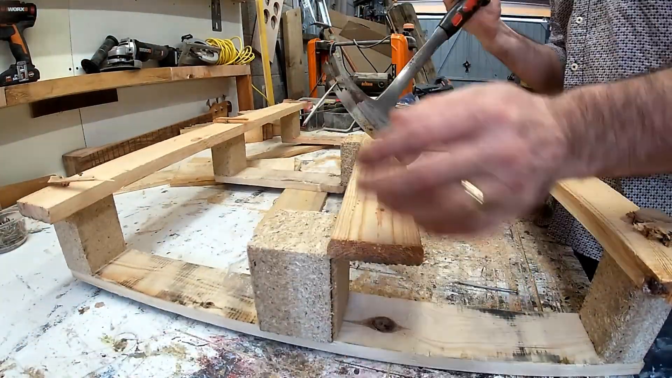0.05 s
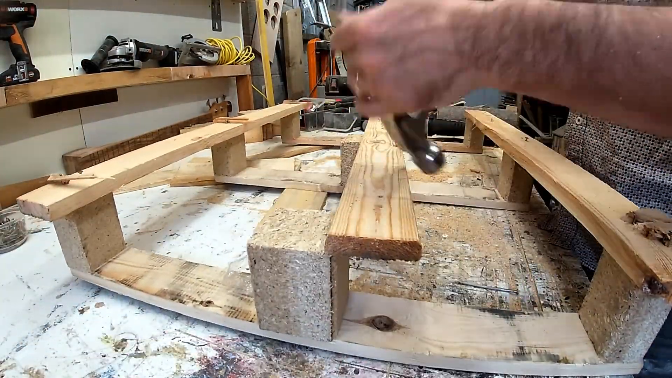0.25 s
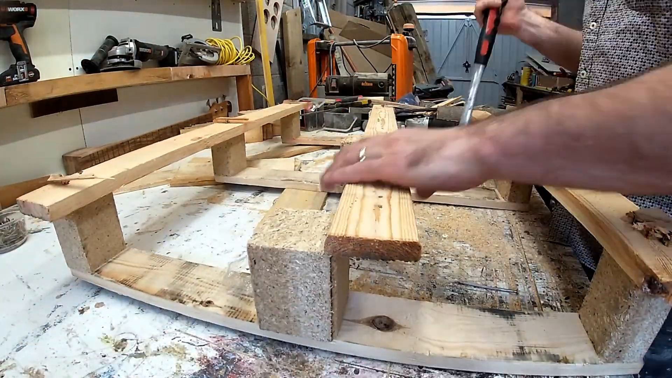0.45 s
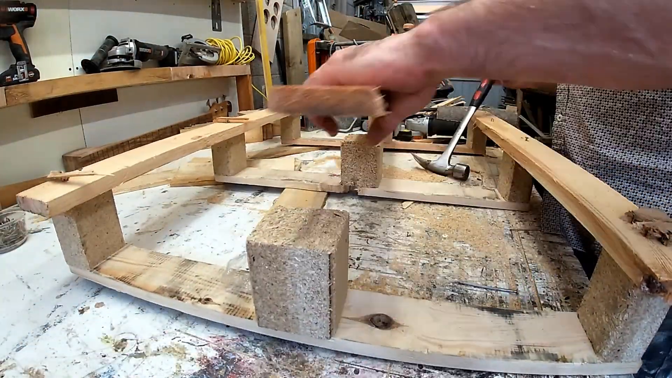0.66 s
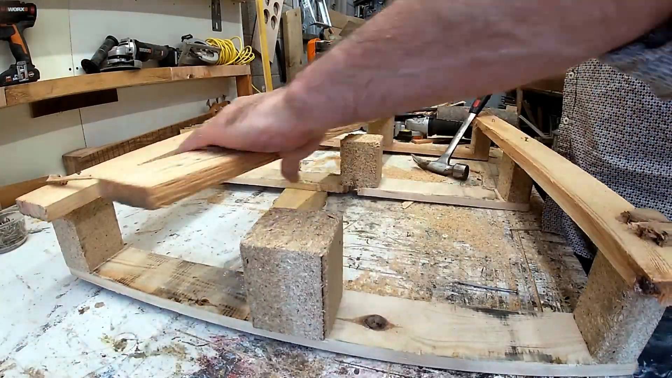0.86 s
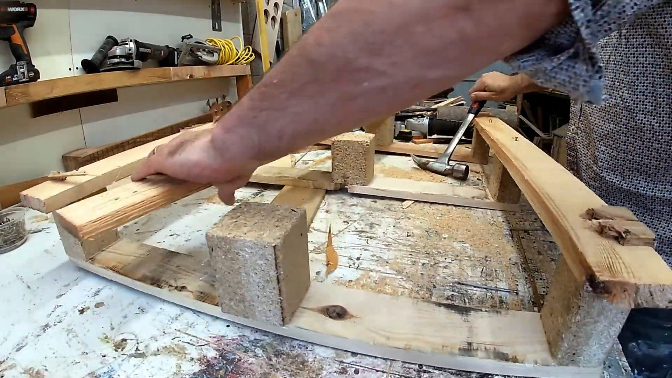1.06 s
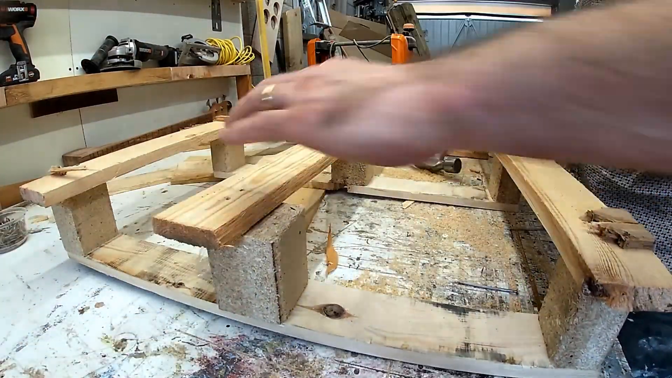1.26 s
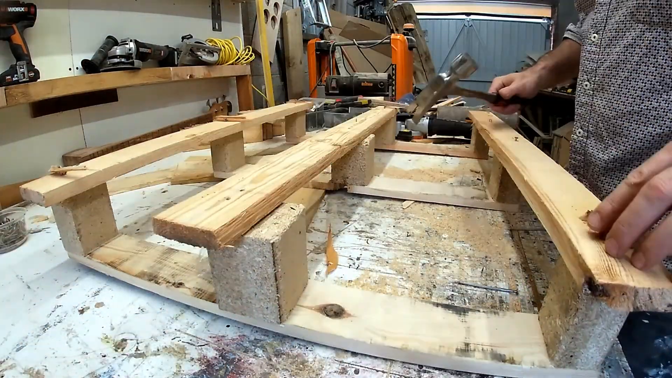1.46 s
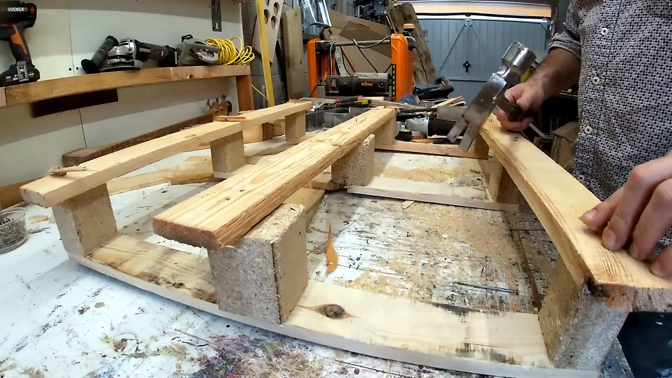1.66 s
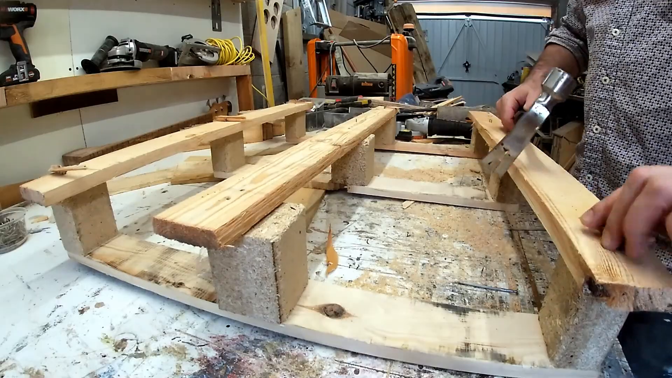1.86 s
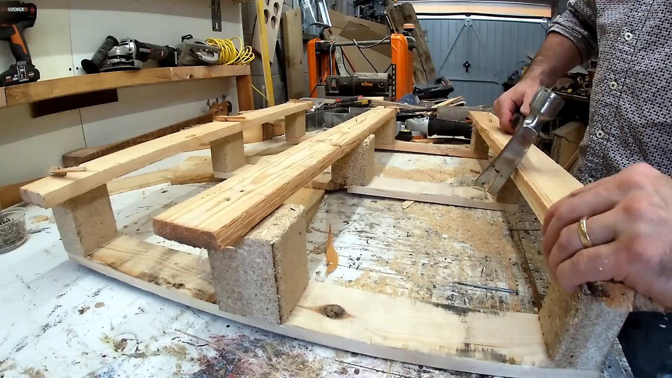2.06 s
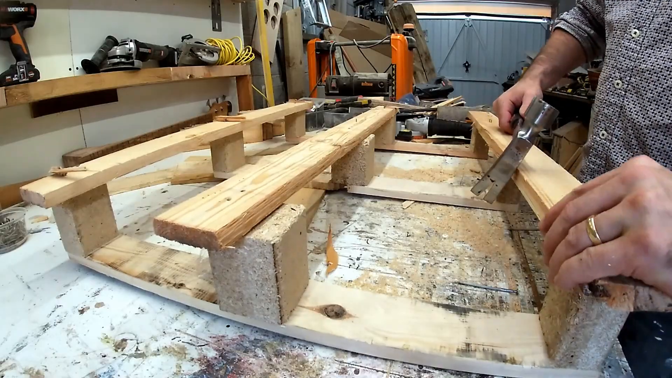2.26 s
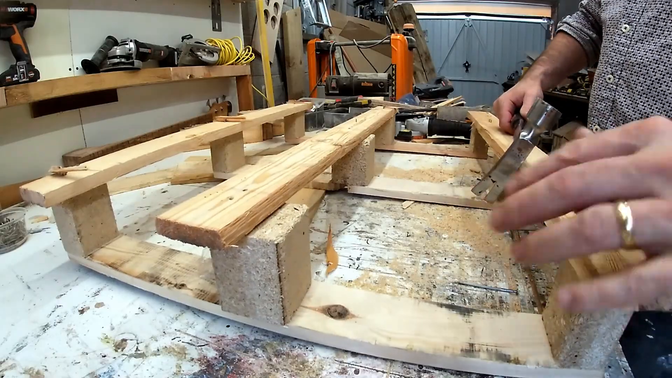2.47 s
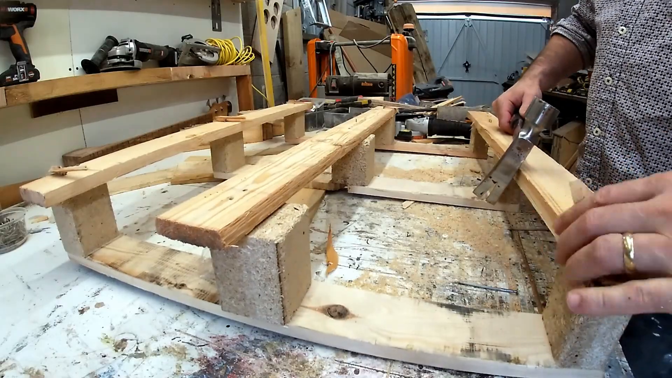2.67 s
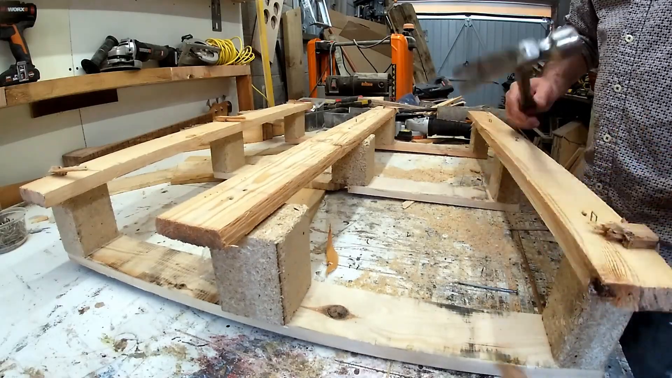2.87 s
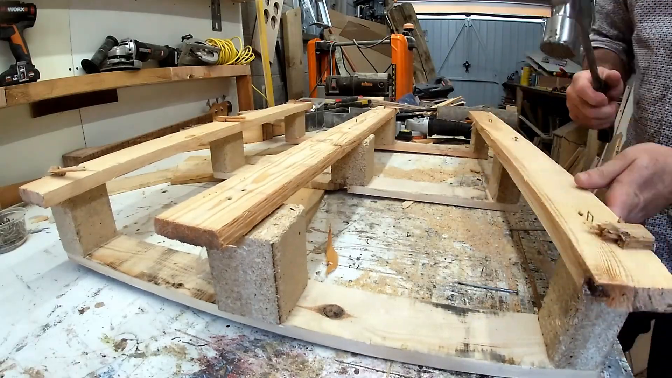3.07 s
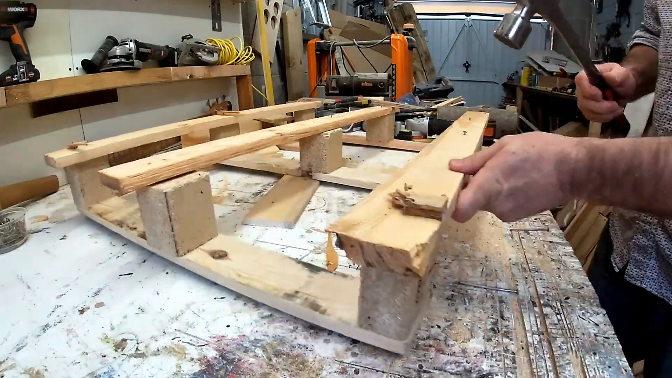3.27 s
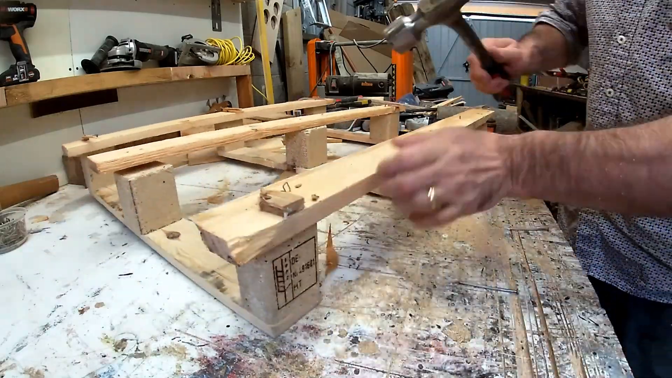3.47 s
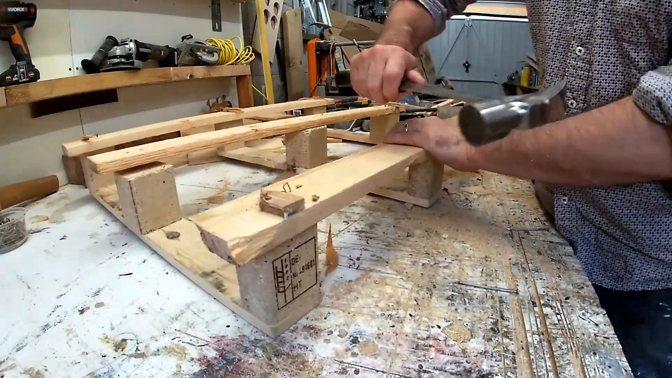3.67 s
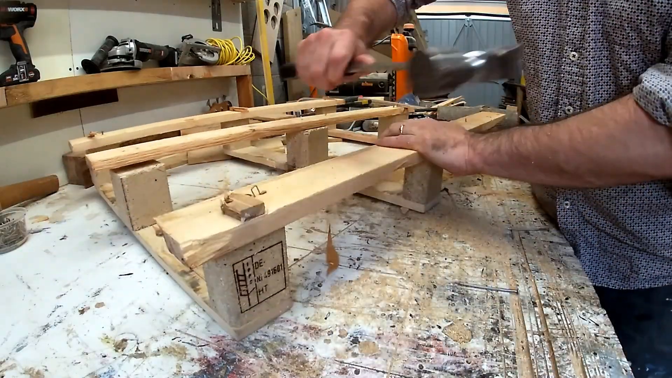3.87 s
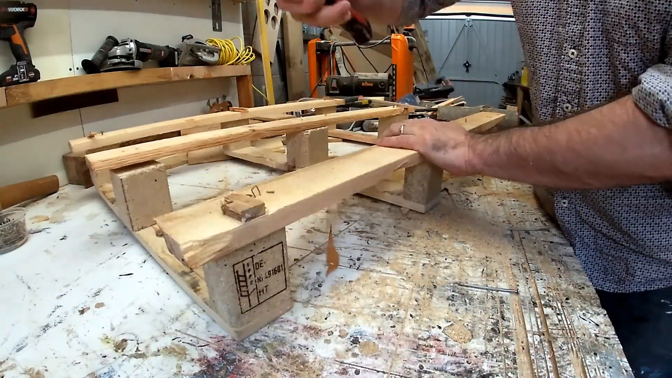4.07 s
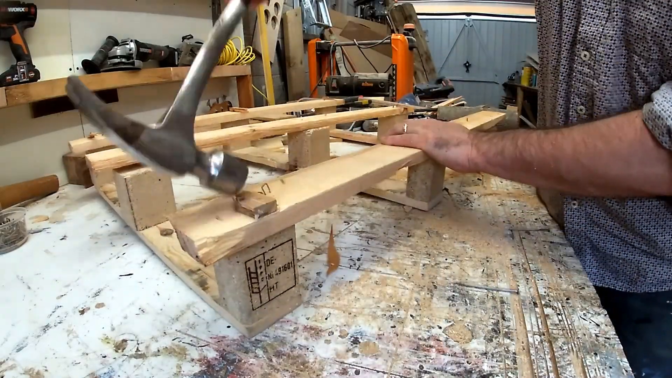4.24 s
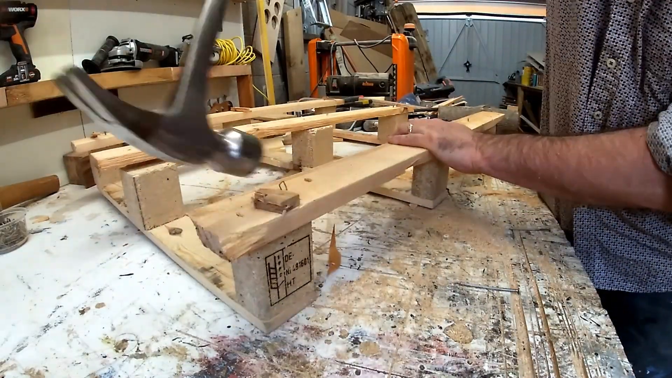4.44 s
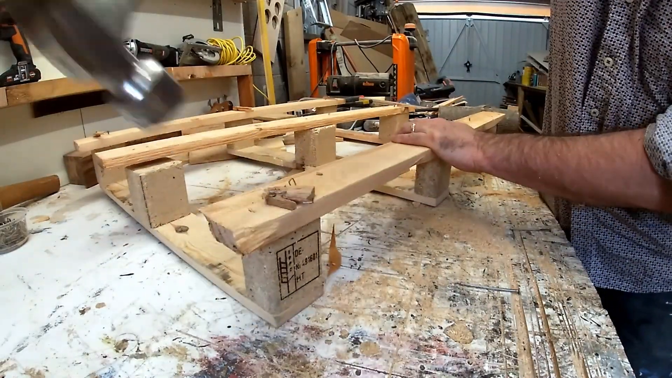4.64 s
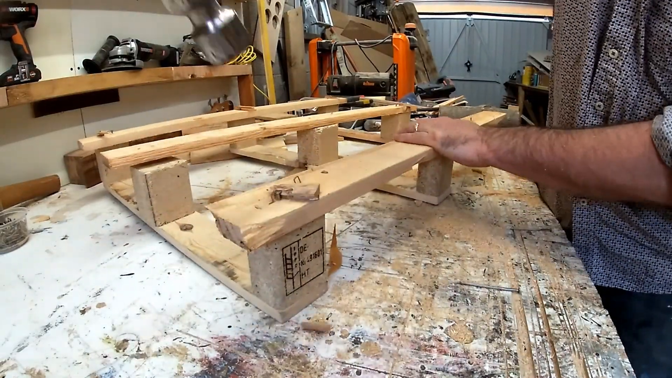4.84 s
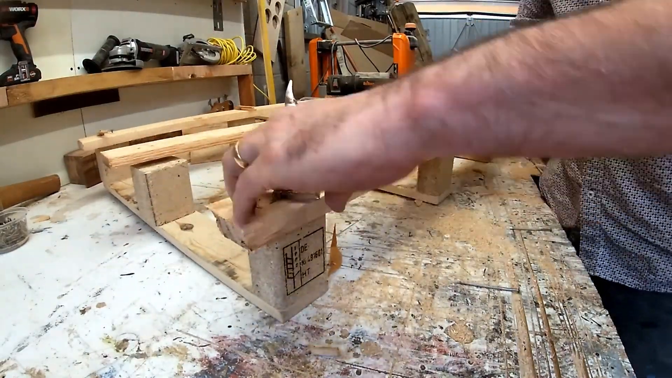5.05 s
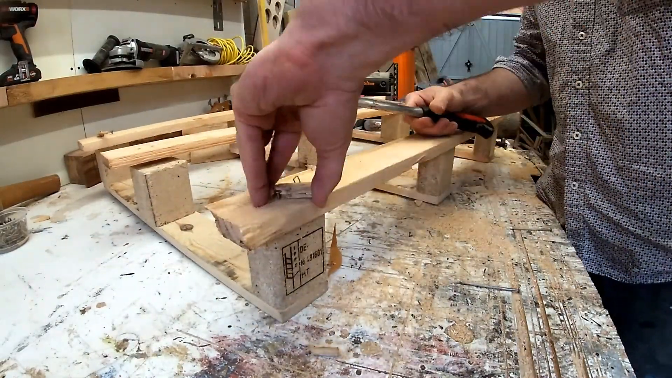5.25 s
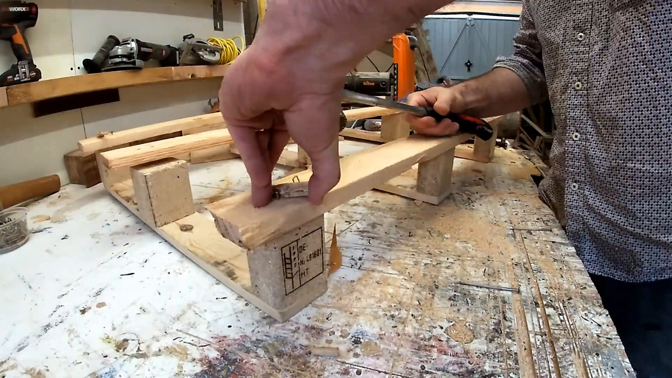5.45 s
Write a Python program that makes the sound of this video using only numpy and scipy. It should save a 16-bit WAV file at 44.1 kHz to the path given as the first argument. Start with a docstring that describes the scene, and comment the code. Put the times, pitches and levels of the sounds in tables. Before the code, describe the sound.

Loose wooden boards clack, creak and scrape on a workshop bench, then a steel hammer strikes a nailed plank six hard times.

```python
"""Pallet taken apart on a workshop bench

Levered boards crack, bump and slide amid light taps and steel clicks, the pallet is dragged round over
the gritty bench top, and a steel claw hammer gives a nailed plank six hard blows. Struck wood is a sum
of dying modes plus noise bursts; snaps are spikes in noise; sliding, creaks and grit are clumpy coloured
noise; nails squeak as gliding sines. Near echoes and a short room tail, over rumble, air and hiss.
"""
import sys
import numpy as np
from scipy import signal
from scipy.fft import rfft, irfft, next_fast_len
from scipy.io import wavfile

SR = 44100
rng = np.random.default_rng(int(sys.argv[2]) if len(sys.argv) > 2 else 0)


def int16_out(signal):
    """Quantize to a 16-bit WAV file."""
    q = np.round(np.clip(np.atleast_2d(signal).T, -1, 1) * 32767)
    wavfile.write(sys.argv[1], SR, q.astype(np.int16))


N = 242991
TIME = np.arange(N) / SR
AGE = TIME[:SR // 2]  # seconds since a contact


def from_db(db):
    """Turns decibels into an amplitude factor."""
    return 10 ** (np.asarray(db) / 20)


def rms_one(x):
    """Scales a steady signal to rms 1."""
    return x / np.sqrt(np.mean(x ** 2) + 1e-20)


def hit_one(x):
    """Scales a hit to rms 1 over its first 20 ms."""
    return x / np.sqrt(np.mean(x[:SR // 50] ** 2))


def dying(t60):
    """Exponential decay that loses 60 dB in t60 seconds."""
    return from_db(-60 * AGE / t60)


def at_hz(points, hz):
    """Reads a curve between its points, along a logarithmic frequency axis."""
    f, value = np.transpose(points)
    return np.interp(np.log(hz + 1), np.log(f), value)


def gain_curve(s, db):
    """Level drawn in straight dB lines from point to point, silent outside them."""
    return from_db(np.interp(TIME, s, db, -np.inf, -np.inf))


def coloured(x, spectrum):
    """Gives a steady signal a spectrum with steep outer skirts; rms 1."""
    hz = np.arange(len(x) // 2 + 1) * SR / len(x)
    low_skirt = 1 / (1 + (spectrum[0][0] / (hz + 1)) ** 8)
    high_skirt = 1 / (1 + (hz / spectrum[-1][0]) ** 8)
    gain = from_db(at_hz(spectrum, hz)) * low_skirt * high_skirt
    return rms_one(irfft(rfft(x) * gain, len(x)))


def noise(spectrum, size):
    """Steady noise with a given spectrum."""
    return coloured(rng.standard_normal(next_fast_len(size)), spectrum)[:size]


def band(x, low_hz, high_hz, order=2):
    """Keeps one frequency band."""
    sos = signal.butter(order, [low_hz, high_hz], "band", fs=SR, output="sos")
    return signal.sosfilt(sos, x)


def highpass(x, low_hz):
    """Cuts the bass below low_hz."""
    return signal.sosfilt(signal.butter(2, low_hz, "high", fs=SR, output="sos"), x)


def drift(rate):
    """Slow random wander of spread 1, with rate knots per second."""
    knots = rng.standard_normal(N // 20)
    return rms_one(np.interp(TIME * rate, np.arange(len(knots)), knots))


def add(track, s, sound):
    """Mixes a sound into a track at s seconds."""
    start = int(round(s * SR))
    track[start:start + len(sound)] += sound[:N - start]


def ring(modes, t60, vary_db, detune, emphasis=((100, 0), (1000, 0))):
    """One blow on a body: each mode shifts with where it is hit and held; higher modes die sooner."""
    out = 0
    lowest_hz = modes[0][0]  # the mode that t60 belongs to
    for hz, db in modes:
        strength, shift = rng.standard_normal(2)
        height = from_db(db + at_hz(emphasis, hz) + vary_db * strength)
        decay = dying(t60 * (lowest_hz / hz) ** (1 / 4))
        out = out + height * decay * np.sin(2 * np.pi * hz * (1 + detune * shift) * AGE)
    return hit_one(out)


def burst(spectrum, crack_t60, tail_t60, tail_db):
    """Modes too dense to tell apart: a quick crack and a weaker tail."""
    decay = dying(crack_t60) + from_db(tail_db) * dying(tail_t60)
    return hit_one(noise(spectrum, len(AGE)) * decay)


def grit(spectrum, grain_db, catch_db, patchy_db):
    """Crushed grains come in clumps, and the colour shifts as the contact patch moves."""
    grain_levels = from_db(grain_db * rng.standard_normal(N) + catch_db * drift(120))
    hiss = coloured(rng.standard_normal(N) * grain_levels, spectrum)
    edges = np.geomspace(500, 18000, 11)
    out = 0
    for low, high in zip(edges, edges[1:]):
        out = out + band(hiss, low, high, order=1) * from_db(patchy_db * drift(35))
    return rms_one(out)


# low rumble of the shop, over time; columns: time_s, level_db
RUMBLE_LEVELS = [(0.0, -57.5), (0.35, -53), (1.45, -50.5), (1.95, -57), (2.8, -46.5), (3.3, -57.5),
                 (4.7, -50.5), (5.5, -53)]
# spectra of the rumble, the air and the hiss; columns: freq_hz, relative_density_db (per Hz)
RUMBLE_SPECTRUM = [(13, -25.5), (22, 7.5), (70, 13.5), (97, 6.5), (124, 4), (170, -23), (220, -35.5),
                   (370, -120)]
AIR_SPECTRUM = [(76, -37.5), (130, -4), (167, -17), (247, -13), (467, 1.5), (655, -11.5), (769, -3),
                (1100, -22.5), (1430, -49.5), (2420, -120)]
HISS_SPECTRUM = [(590, -23.5), (1000, -0.5), (1350, -3), (1590, 0), (5130, -3.5), (13600, -13),
                 (16000, -31)]
# swells added to the steady hiss; columns: top_s, half_width_s (to 1/e), level_db
HISS_SWELLS = [(0.04, 0.19, -49.5), (2.85, 0.18, -68), (3.65, 0.21, -76.5), (4.192, 0.12, -71.5),
               (5.2, 0.19, -63)]
AIR_DB, STEADY_HISS_DB = -57, -69


def background():
    """Three noises of the shop: rumble that rises and falls, steady air, hiss that swells and sinks."""
    rumble_level = from_db(np.interp(TIME, *np.transpose(RUMBLE_LEVELS)))
    rumble = rumble_level * noise(RUMBLE_SPECTRUM, N)
    hiss_level = from_db(STEADY_HISS_DB)
    for top_s, width_s, db in HISS_SWELLS:
        hiss_level = hiss_level + from_db(db) * np.exp(-((TIME - top_s) / width_s) ** 2)
    hiss = hiss_level * noise(HISS_SPECTRUM, N)
    return rumble + hiss + from_db(AIR_DB) * noise(AIR_SPECTRUM, N)


# modes of a loose board; columns: pitch_hz, relative_level_db
BOARD_MODES = [(165, -18.5), (226, -9.5), (258, -3), (290, 1), (345, 4.5), (398, 6), (470, 7), (548, 4),
               (610, -10.5), (680, -10), (735, -2), (790, -13.5), (926, -10.5), (1367, -22), (1470, -27.5)]
# clack of wood, also heard in the hammer blows; columns: freq_hz, relative_density_db (per Hz)
CLACK_SPECTRUM = [(500, -12.5), (900, 0.5), (1500, 3), (2400, -7.5), (3500, -10.5), (6000, -16.5),
                  (15000, -36.5)]


def touch(body_db, weight_db, clack_db):
    """A bump or tap on wood: a soft contact that builds over a few milliseconds, then rings and dies."""
    # a heavier, slower contact leans on the low modes
    weight = [(260, weight_db), (400, 0.0077)]
    modes = ring(BOARD_MODES, t60=0.1, vary_db=4.0, detune=0.042, emphasis=weight)
    body = from_db(body_db) * hit_one(highpass(modes, 280) * (dying(0.77) + 0.54))
    clack = from_db(clack_db) * burst(CLACK_SPECTRUM, crack_t60=0.065, tail_t60=0.37, tail_db=-21.5)
    soft_onset = 1 - dying(0.006)
    return (body + clack) * soft_onset


# bumps and light taps of boards, fingers and tool; body and clack levels are before the soft onset
# columns: start_s, body_db, low_mode_weight_db, clack_db, second_touch_db (added to the second touch)
BUMPS_AND_TAPS = [(0.113, -39, -6.5, -49, -11.5), (0.3, -40, -5, -53.5, -8.5), (0.402, -27.5, -6, -45, -9),
                  (0.468, -26, -9, -41, -26), (0.584, -12.5, -5.5, -26, -20.5),
                  (0.783, -34, -32, -44.5, -14), (0.821, -30, -7, -44, -1.5), (1.052, -35.5, 12, -47, -3),
                  (1.176, -40, 28, -69, -17), (1.298, -29, 0, -51, -20), (1.65, -39, -25, -55.5, -26),
                  (1.91, -38, -7, -56, -16), (1.967, -31, -7, -55, 5), (2.079, -41, -6, -79, 0),
                  (2.147, -41, -4, -75, -12), (2.408, -27, 9.5, -48, 6), (2.458, -22, 1.5, -54.5, -9),
                  (2.837, -23.5, -1.5, -62, -12.5), (2.977, -43.5, -34, -35, -22),
                  (3.065, -46, -28, -42.5, 1.5), (3.209, -28.5, 21, -45, -2.5),
                  (3.334, -31, 6.5, -42.5, -6), (3.849, -27.5, 5, -36, -18), (3.887, -30, -10, -49, -19),
                  (5.07, -38, 17, -80, -26), (5.12, -38, 22, -85, -13.5), (5.159, -39, -19, -73, -10.5),
                  (5.345, -47.5, -15, -83, -16)]
# second touch: delay in s, extra low-mode weight in dB, change of clack in dB
SECOND_S, SECOND_WEIGHT_DB, SECOND_CLACK_DB = .024, 7, -5


def bumps_and_taps():
    """Bumps and light taps of boards, fingers and tool, each with a duller second touch."""
    out = np.zeros(N)
    for s, body_db, weight_db, clack_db, second_db in BUMPS_AND_TAPS:
        second = touch(body_db, weight_db + SECOND_WEIGHT_DB, clack_db + SECOND_CLACK_DB)
        add(out, s, touch(body_db, weight_db, clack_db))
        add(out, s + SECOND_S, from_db(second_db) * second)
    return out


def brief_ring(force, low_hz, high_hz, t60, ring_db, count):
    """Each snap or click rings briefly at pitches of its own, under the direct sound of its force."""
    steps = (np.arange(count) + rng.random(count)) / count
    pitches = low_hz * (high_hz / low_hz) ** steps
    age = AGE[:SR // 10]
    waves = np.cos(2 * np.pi * pitches[:, None] * age)
    modes = waves.T @ rng.normal(0, 1, count) * dying(t60)[:len(age)]
    direct = band(force, low_hz, high_hz)
    rung = signal.fftconvolve(direct, modes)[:len(force)]
    return direct + from_db(ring_db) * rung * np.std(direct) / np.std(rung)


# sharp snaps and steel clicks; columns: spike_s, mid_db, treble_db, tail_db (of the force after the spike)
SNAPS_AND_CLICKS = [(0.295, -53.5, -57.5, -14), (0.395, -49.5, -51, 0), (0.4672, -30, -20.5, -21),
                    (0.477, -36, -50, -11), (0.5597, -34, -31, -5), (0.5966, -51, -49.5, 4),
                    (0.6107, -58, -36, -13.5), (0.642, -49, -38, -7), (0.819, -38.5, -63, 2),
                    (0.9084, -47, -50, 4), (1.006, -41, -52, -2), (1.1588, -41.5, -44.5, -6),
                    (1.906, -56.5, -57, 4), (2.1037, -52.5, -62, -20), (2.3001, -68.5, -51.5, -19),
                    (2.3943, -47.5, -39, -3), (2.4023, -31.5, -28, 3), (2.9425, -26, -53, 1.5),
                    (2.9786, -28.5, -66, -16), (3.0842, -43.5, -53.5, 0), (3.1522, -36.5, -64, 5),
                    (4.9053, -48, -49, -7)]
# force of the spike; force of the swell before it at 0 dB treble; swell dB per dB of treble
SPIKE_DB, SWELL_DB, SWELL_FOLLOWS = 12.5, -4, 0.561


def snaps_and_clicks():
    """Sharp snaps and steel clicks: short noise swells into a spike, then dies away."""
    out = np.zeros(N)
    lead = SR // 50  # 20 ms of swelling noise
    for s, mid_db, treble_db, tail_db in SNAPS_AND_CLICKS + ticks():
        before = from_db(SWELL_DB + SWELL_FOLLOWS * treble_db) * dying(0.015)[:lead][::-1]
        after = 0.2 * dying(0.0054) + from_db(tail_db) * dying(0.07)
        envelope = np.concatenate([before, after])
        uneven = from_db(2.5 * rng.standard_normal(len(envelope)))
        force = envelope * rng.standard_normal(len(envelope)) * uneven
        force[lead] += from_db(SPIKE_DB)
        mid = brief_ring(force, 1700, 5600, t60=0.01, ring_db=-10.0, count=14)
        treble = brief_ring(force, 6200, 14500, t60=.02, ring_db=-10.0, count=8)
        for part, db in (mid, mid_db), (-treble, treble_db):
            # levels hold over the 20 ms from the spike on
            add(out, s - lead / SR, from_db(db) * part / np.std(part[lead:2 * lead]))
    return out


# a board is lifted off, shifted across, the pallet is dragged round and nudged
# columns: time_s, judder_db, grit_db
LIFT = [(0.75, -47, -65), (0.82, -33, -45), (0.844, -29, -49), (0.9, -67, -69)]
SHIFT = [(0.9, -61, -75), (0.906, -49, -63), (0.94, -30.5, -45), (1.024, -42, -40.5), (1.054, -30, -33.5),
         (1.106, -45, -42.5), (1.224, -39, -52), (1.286, -25, -34.5), (1.36, -58.5, -97)]
DRAG = [(3.13, -74, -55), (3.15, -51.5, -42.5), (3.22, -35, -31), (3.294, -39.5, -31), (3.378, -34, -37.5),
        (3.4, -35, -41), (3.498, -33, -34), (3.56, -61.5, -63)]
NUDGE = [(3.6, -80.5, -63), (3.666, -55.5, -47.5), (3.72, -77, -81)]
# spectra of shaken boards and crushed grit; columns: freq_hz, relative_density_db (per Hz)
JUDDER_SPECTRUM = [(53, -54.5), (90, -6.5), (151, -11), (239, 0.5), (301, 0.5), (460, 2.5), (578, -2.5),
                   (641, -10), (744, -8.5), (1400, -19), (1820, -23), (3080, -120)]
GRIT_SPECTRUM = [(470, -19.5), (800, -9.5), (1700, -12.5), (2380, -6), (2950, -12), (4130, -4.5),
                 (5310, -11.5), (6570, -8.5), (8880, -8.5), (14800, -18.5), (16000, -17)]


def sliding():
    """Catches and slips shake the boards while grit is crushed under them."""
    shaking = crushing = 0
    for stroke in (LIFT, SHIFT, DRAG, NUDGE):
        s, judder_db, grit_db = np.transpose(stroke)
        shaking = shaking + gain_curve(s, judder_db)
        crushing = crushing + gain_curve(s, grit_db)
    slips = rng.standard_normal(N) * from_db(2.8 * rng.standard_normal(N) + 3.7 * drift(130))
    judder = shaking * coloured(slips, JUDDER_SPECTRUM)
    return judder + crushing * grit(GRIT_SPECTRUM, grain_db=1.0, catch_db=1.0, patchy_db=3.5)


# nails squeak in the wood; columns: start_s, length_s, centre_pitch_hz, peak_db
SQUEAKS = [(0.798, 0.028, 6450, -41.5), (0.937, 0.02, 5070, -40), (2.783, 0.028, 13400, -45),
           (3.148, .02, 7200, -53), (3.149, .022, 3630, -38)]


def squeaks():
    """A nail slips through its hole with an unsteady, slightly falling whistle."""
    out = np.zeros(N)
    for s, length_s, hz, db in SQUEAKS:
        size = int(length_s * SR)
        wobble = 0.057 * drift(820)[:size]
        fall = 0.036 * np.linspace(-1, 1, size)
        pitch = hz * (1 + wobble - fall)
        whistle = np.sin(2 * np.pi * np.cumsum(pitch) / SR)
        add(out, s, from_db(db) * signal.windows.tukey(size) * whistle)
    return out


# the claw is worked under a board; columns: start_s, length_s, creak_end_db, strongest_tick_db
CREAKS = [(1.483, .1, -56, -58), (1.902, .21, -55, -61), (2.205, .19, -63, -61), (2.583, .28, -54, -60)]
# columns: freq_hz, relative_density_db (per Hz)
CREAK_SPECTRUM = [(710, -86), (1200, -8), (1540, -10), (1870, -22), (2950, 7.5), (3620, -12.5), (4800, 3.5),
                  (6100, -4), (6650, -7.5), (14000, -10), (16000, -14)]
CREAK_RISE_DB = 7  # growth over one push


def creaking():
    """The claw works its way under a board in small dry slips that grow as the push builds."""
    effort = 0
    for start_s, length_s, end_db, _ in CREAKS:
        effort = effort + gain_curve([start_s, start_s + length_s], [end_db - CREAK_RISE_DB, end_db])
    return effort * grit(CREAK_SPECTRUM, grain_db=7.0, catch_db=7.5, patchy_db=-1.0)


# rate of the ticks; their treble against their mid level; the tail of their force
TICKS_PER_S, TICK_TREBLE_DB, TICK_TAIL_DB = 18, 0, -1


def ticks():
    """Small fibres give way at uneven moments of each push: rows of faint snaps for snaps_and_clicks()."""
    rows = []
    for start_s, length_s, _, tick_db in CREAKS:
        count = max(1, round(length_s * TICKS_PER_S))
        for k, (when, weakness) in enumerate(rng.random((count, 2))):
            s = start_s + length_s * (k + when) / count
            db = tick_db - 7 * weakness
            rows.append((s, db, db + TICK_TREBLE_DB, TICK_TAIL_DB))
    return rows


# hammer blows, levels before the soft onsets; columns: start_s, plank_db, bench_thump_db, knock_db, steel_db
BLOWS = [(3.804, -10.5, -15, -22.5, -24), (3.97, -9.5, -16.5, -19.5, -37), (4.285, -8, -15, -20.5, -46.5),
         (4.457, -10, -10, -25, -24), (4.62, -7, -9, -21.5, -26.5), (4.785, -7, -7, -18.5, -25.5)]
# modes of the nailed plank, and of the pallet frame and bench under it; columns: pitch_hz, relative_level_db
PLANK_MODES = [(335, -19.5), (385, -7), (432, -5), (468, 3.5), (492, 0), (526, -3), (560, -17), (675, -17),
               (722, -18.5), (778, 2), (802, -18.5), (915, -10.5), (1090, -23.5), (1227, -9), (1340, -23.5),
               (1480, -12.5), (1540, -18), (1641, -22.5), (1882, -9.5), (2172, -11), (2358, -14),
               (2720, -23), (3300, -36), (3700, -32), (4000, -19.5)]
BENCH_MODES = [(102, -12.5), (128, -21), (170, -12), (240, -1.5), (272, 1)]
# spectra of the shaken rest of the pallet, the heavy bench's boom and the steel contact
# columns: freq_hz, relative_density_db (per Hz)
FRAME_SPECTRUM = [(85, -4.5), (130, -8.5), (250, -3.5), (480, -9.5), (620, -7), (800, -15), (1100, -18.5)]
BOOM_SPECTRUM = [(40, -11), (70, 0), (110, -4.5), (150, -26)]
STEEL_SPECTRUM = [(900, -13), (2500, 10.5), (4500, 0.5), (7000, 0), (12000, 1), (16000, -4)]
FRAME_DB, BOOM_DB = -4.5, -29.5  # against the bench thump


def hammer():
    """Steel meets the plank, the plank rings and hands its swing on to the frame and bench."""
    out = np.zeros(N)
    for s, plank_db, thump_db, knock_db, steel_db in BLOWS:
        # a harder contact wakes more of the upper modes
        hardness = [(520, 0.017), (1000, knock_db - plank_db + 8.0)]
        # the first few swings are the strongest, and a narrow plank radiates little bass
        swing = (1 - dying(0.012)) * (dying(0.1) + 1.3)
        modes = ring(PLANK_MODES, t60=0.12, vary_db=2.06, detune=0.011, emphasis=hardness)
        plank = from_db(plank_db) * hit_one(highpass(modes * swing, 260))
        # each 1 - dying() is a soft onset
        bench = ring(BENCH_MODES, t60=0.1, vary_db=2.0, detune=0.04) * (1 - dying(0.017))
        bench = highpass(bench, 86)
        frame = burst(FRAME_SPECTRUM, crack_t60=0.13, tail_t60=0.1, tail_db=-12.5)
        frame = from_db(FRAME_DB) * frame * (1 - dying(0.0082))
        boom = burst(BOOM_SPECTRUM, crack_t60=0.65, tail_t60=1.0, tail_db=-5)
        boom = from_db(BOOM_DB) * boom * (1 - dying(0.035))
        thump = from_db(thump_db) * (bench + frame + boom)
        clack = burst(CLACK_SPECTRUM, crack_t60=0.0075, tail_t60=0.096, tail_db=-3.5)
        clack = from_db(knock_db) * clack * (1 - dying(0.0079))
        steel = from_db(steel_db) * burst(STEEL_SPECTRUM, crack_t60=0.0076, tail_t60=0.094, tail_db=-9)
        add(out, s, plank + thump + clack + steel)
    return out


# faint echoes off the bench top and nearby boards; columns: delay_s, level_db
NEAR_ECHOES = [(.0013, -35.5), (.0031, -25), (0.013, -15.5)]


def near_echoes(x):
    """Small hard surfaces throw back only the upper range."""
    out = x.copy()
    upper = highpass(x, 1000)
    for delay_s, db in NEAR_ECHOES:
        add(out, delay_s, from_db(db) * upper)
    return out


# room decay; columns: freq_hz, t60_s
ROOM_T60 = [(100, 0.41), (300, 0.13), (800, 0.092), (2000, 0.053), (6000, 0.081), (15000, 0.082)]


def workshop(x, wet_db, delay_s):
    """Clutter scatters the sound into a short smooth tail that lasts longest in the bass."""
    edges = np.geomspace(70, 18000, 9)
    tail = 0
    for low, high in zip(edges, edges[1:]):
        decay = dying(at_hz(ROOM_T60, np.sqrt(low * high)))
        tail = tail + band(rng.standard_normal(len(AGE)), low, high) * decay
    tail = tail * np.clip(AGE / delay_s - .5, 0, 1)  # fades in around delay_s
    return x + from_db(wet_db) * signal.fftconvolve(x, tail / np.linalg.norm(tail))[:N]


def gain_control(x, threshold_db, release_db_per_s, attack_s):
    """Levels over the threshold turn the gain down just after their attack; it creeps back up."""
    power = signal.lfilter([1 / 200], [1, 1 / 200 - 1], x ** 2)  # smoothed over about 200 samples
    level = 10 * np.log10(np.maximum(power, 1e-12))
    release = release_db_per_s * TIME
    held = np.maximum.accumulate(level + release, axis=-1) - release  # peaks sink at the release rate
    pole = np.exp(-1 / (attack_s * SR))
    reduction_db = signal.lfilter([1 - pole], [1, -pole], np.maximum(held - threshold_db, 0))
    return x * from_db(-reduction_db)


def scene():
    """The work, its near echoes and the room, over the background of the shop."""
    work = bumps_and_taps() + snaps_and_clicks() + sliding() + squeaks() + creaking() + hammer()
    return (workshop(near_echoes(work), wet_db=-17.5, delay_s=0.009) + background())[None]


def record(dry):
    """Gain control, slightly rounded peaks, and the top is cut."""
    held = gain_control(dry, threshold_db=-11.0, release_db_per_s=11.5, attack_s=0.05)
    rounded = held / (1 + (held / .82) ** 4) ** (1 / 4)
    top_cut = signal.cheby2(20, 70, 16700, fs=SR, output="sos")  # 70 dB down from 16.7 kHz up
    return signal.sosfilt(top_cut, rounded)


dry = scene()
out = record(dry)
int16_out(out)
```